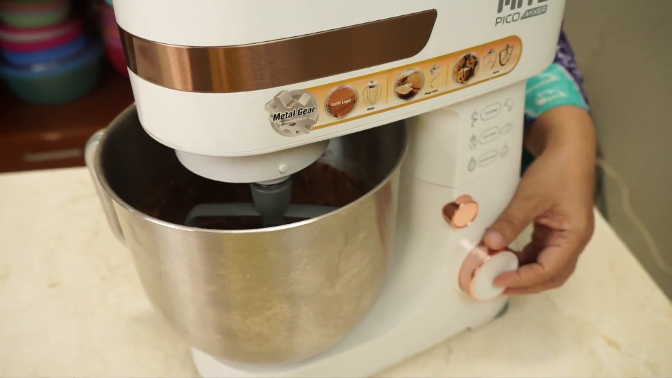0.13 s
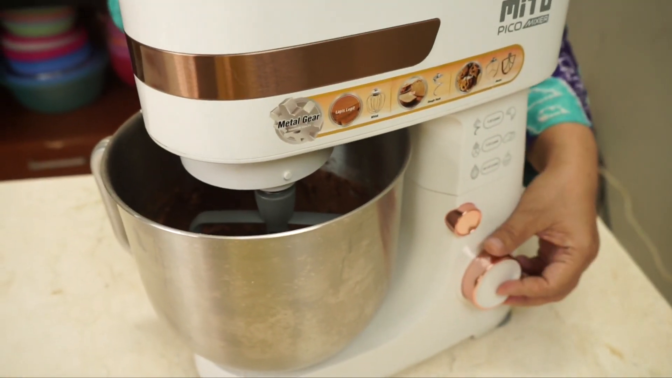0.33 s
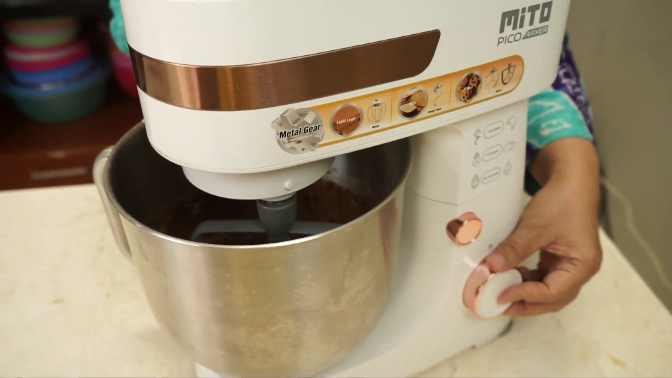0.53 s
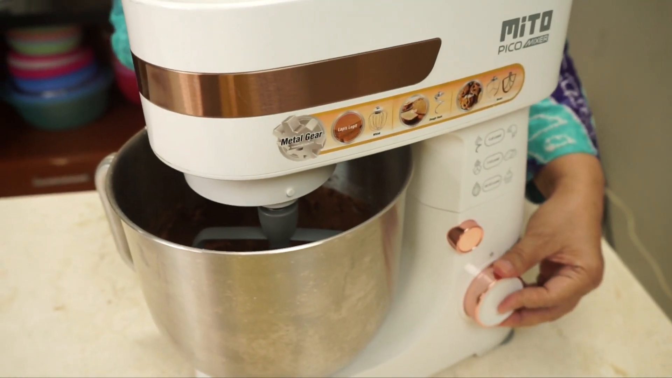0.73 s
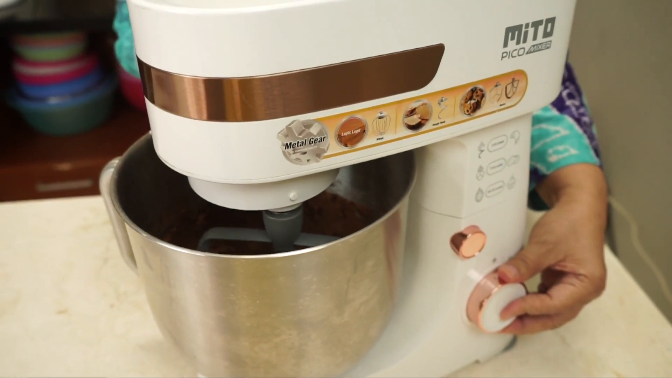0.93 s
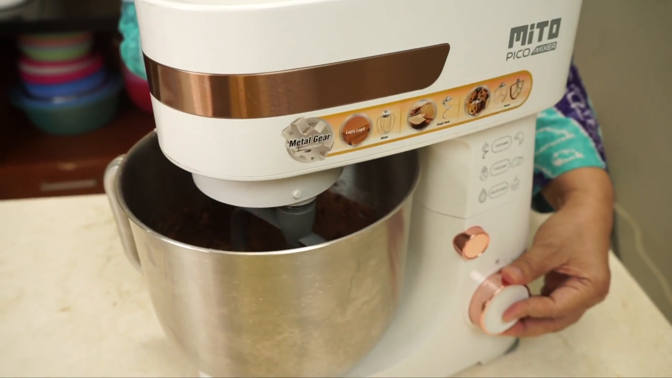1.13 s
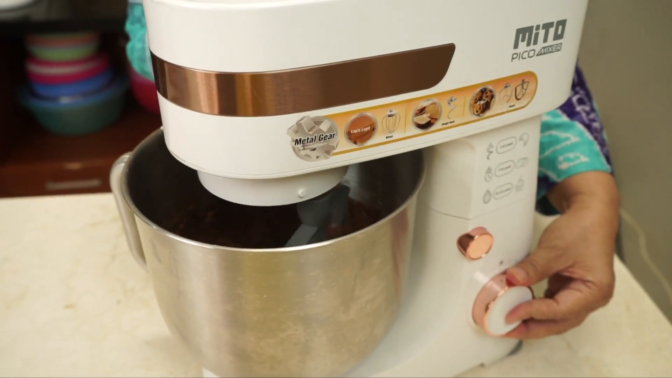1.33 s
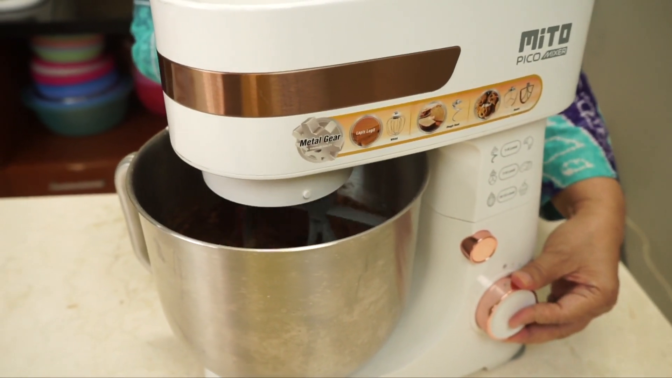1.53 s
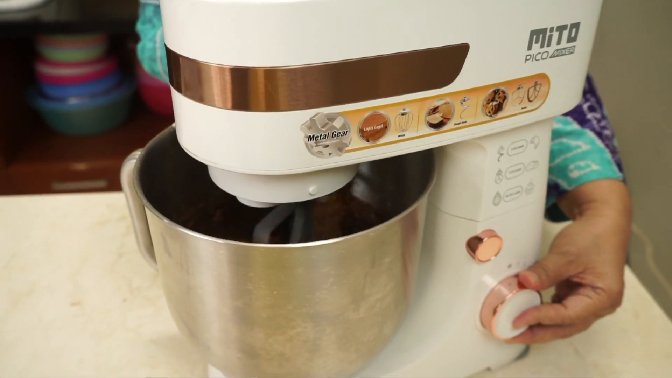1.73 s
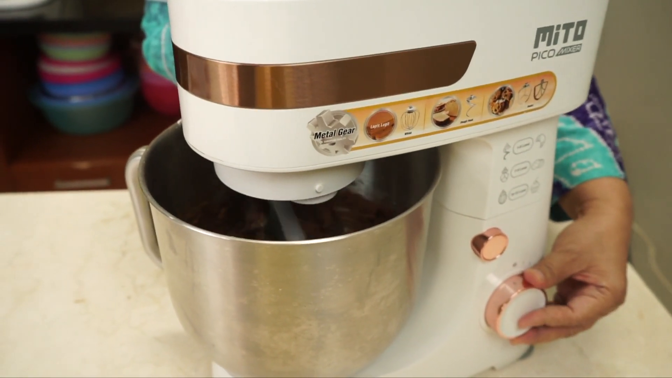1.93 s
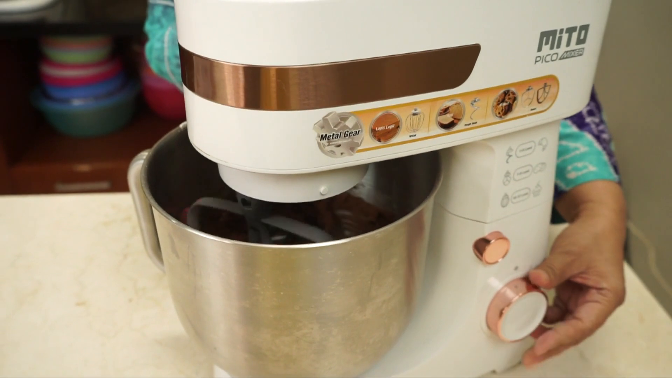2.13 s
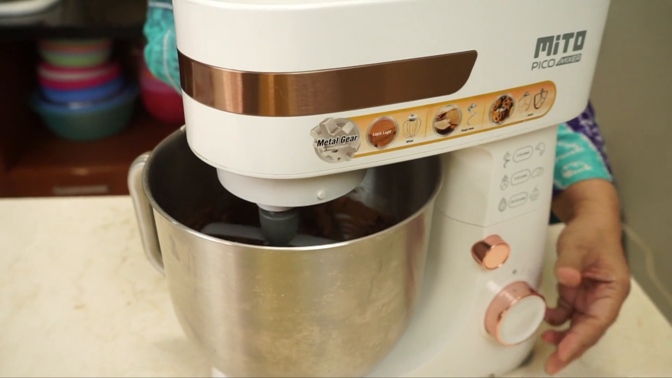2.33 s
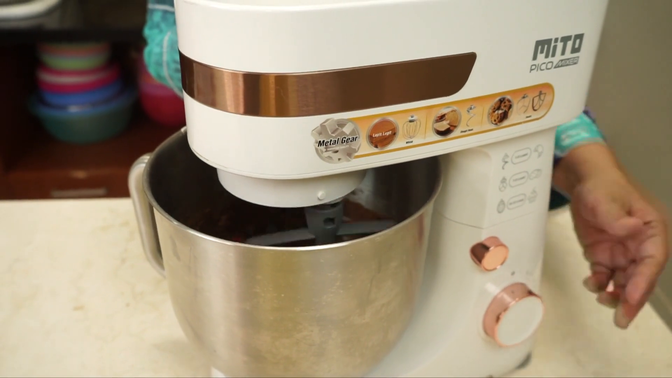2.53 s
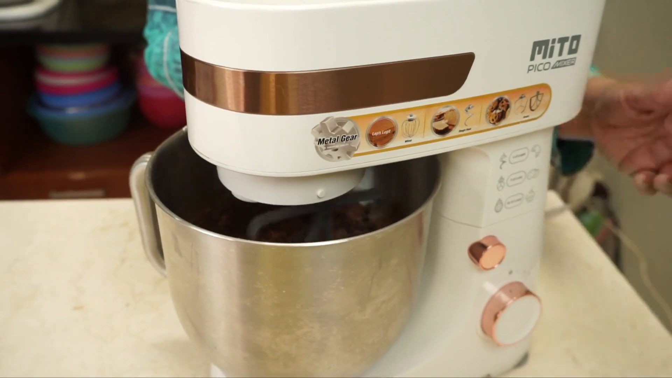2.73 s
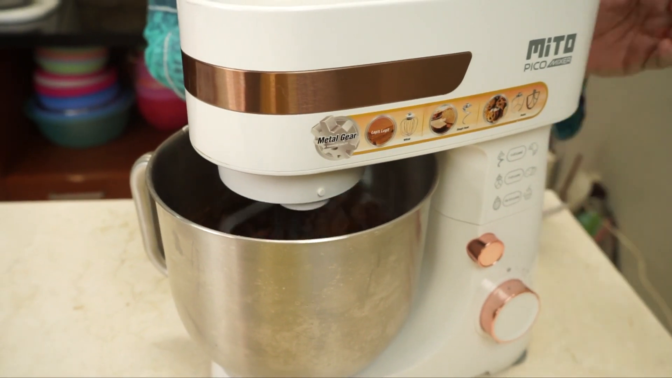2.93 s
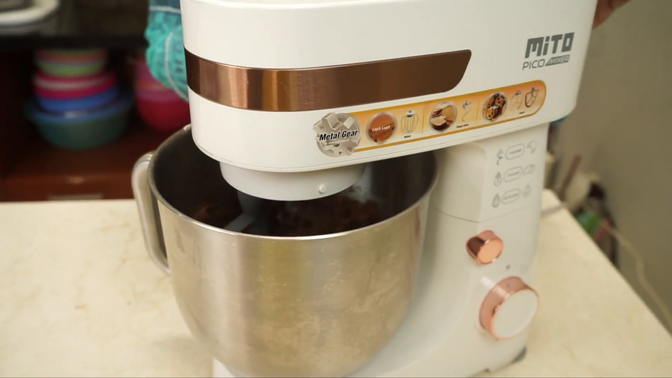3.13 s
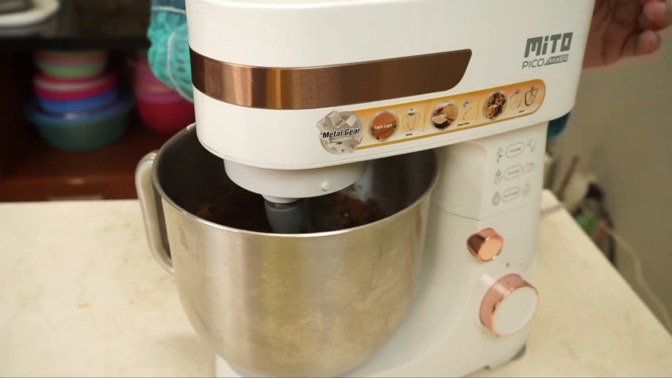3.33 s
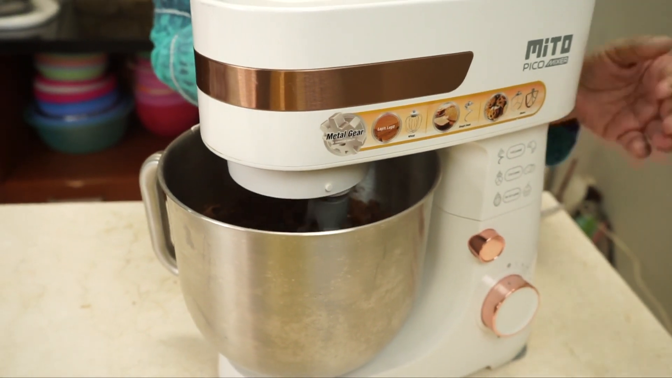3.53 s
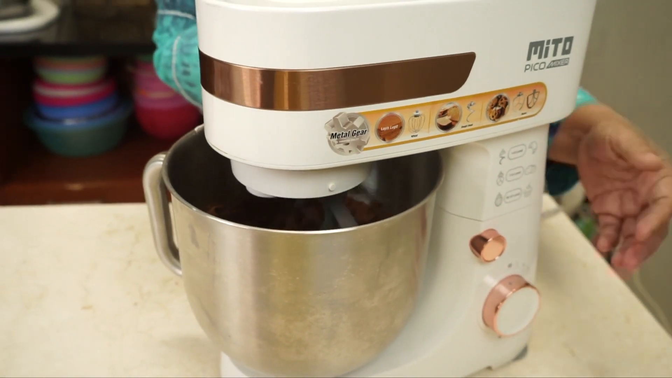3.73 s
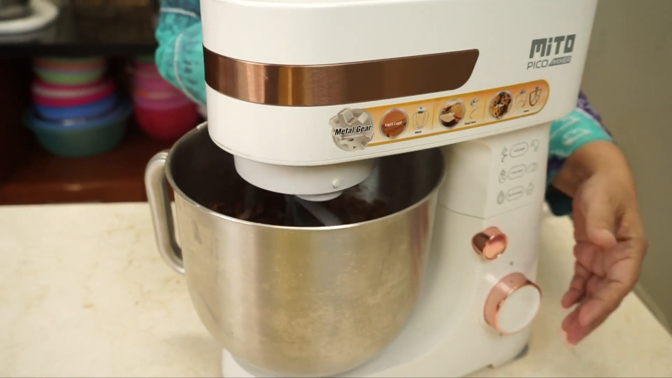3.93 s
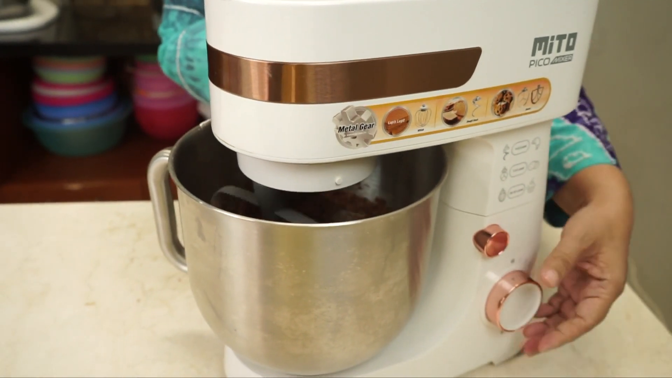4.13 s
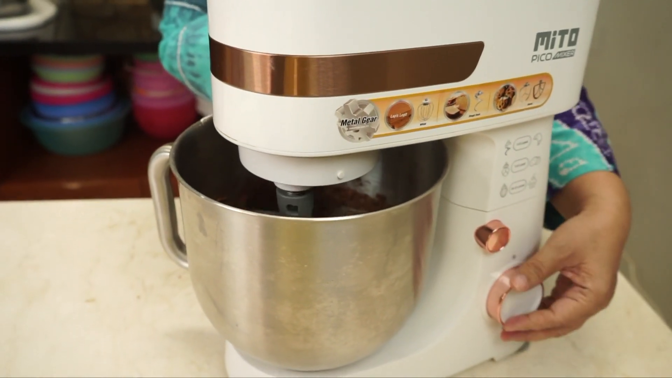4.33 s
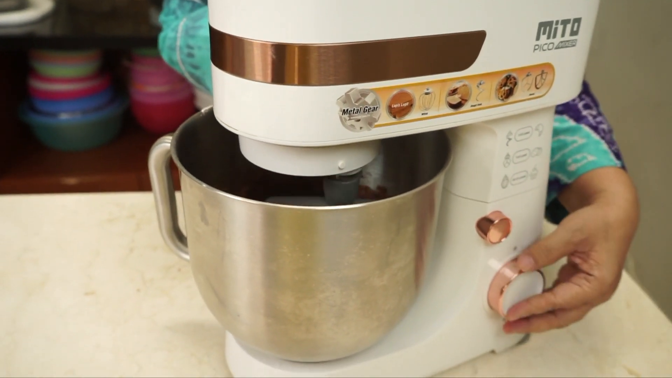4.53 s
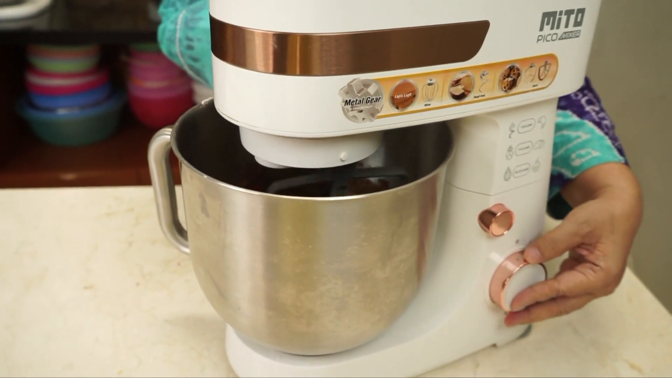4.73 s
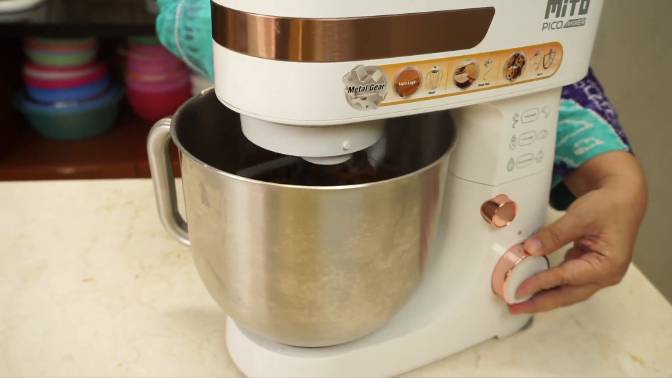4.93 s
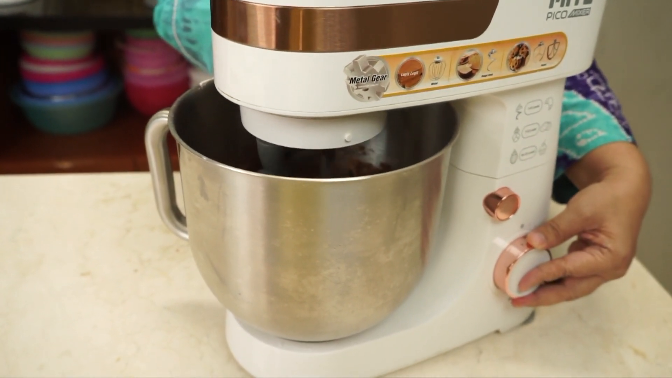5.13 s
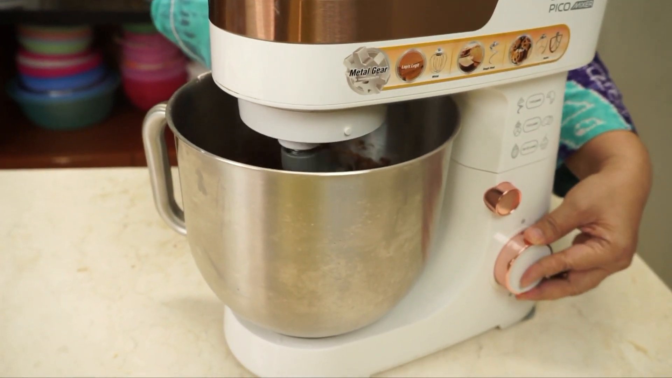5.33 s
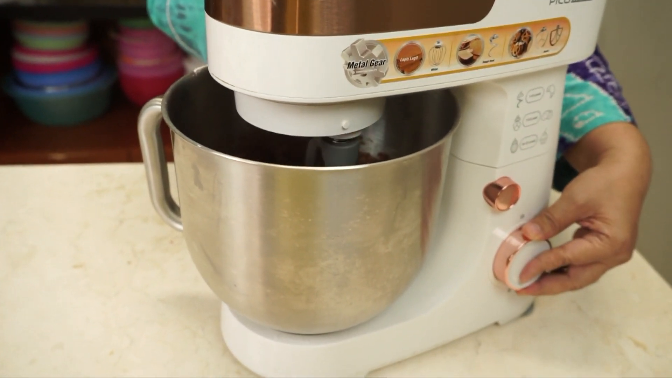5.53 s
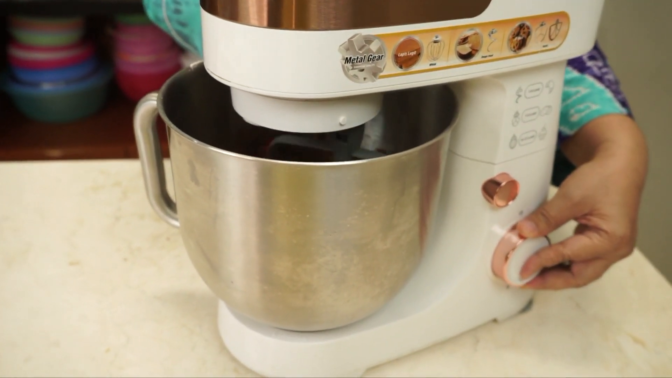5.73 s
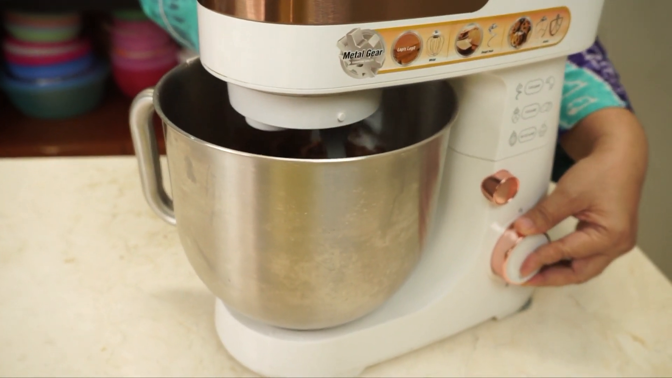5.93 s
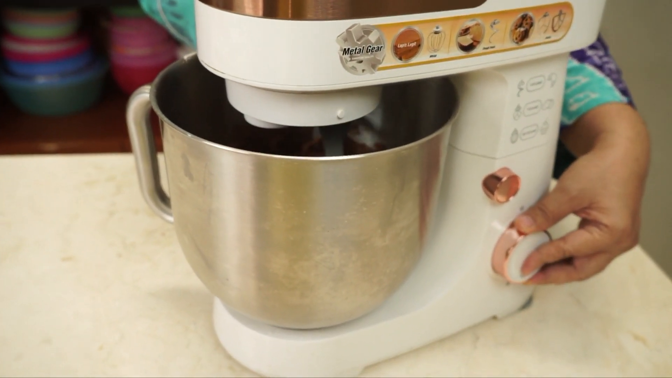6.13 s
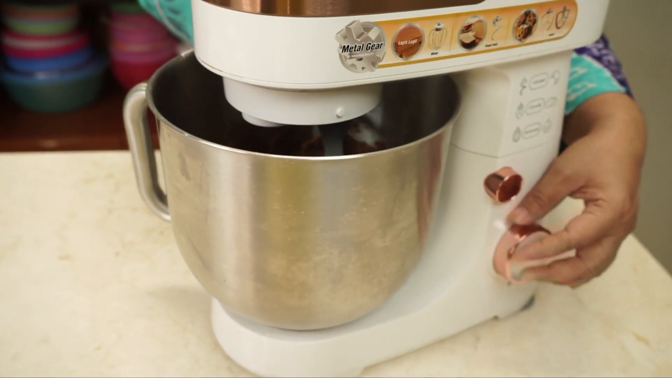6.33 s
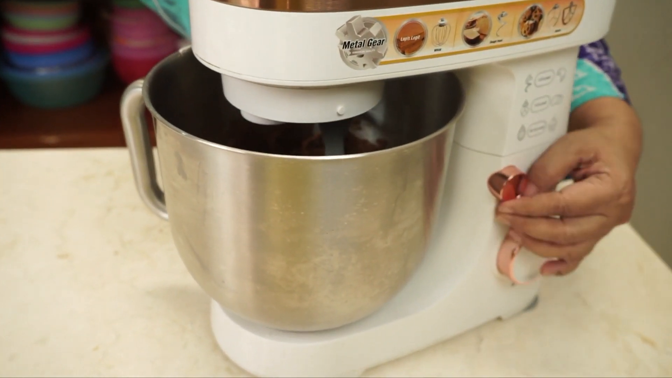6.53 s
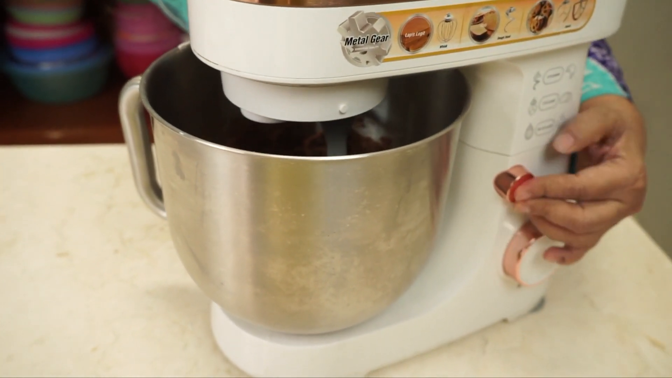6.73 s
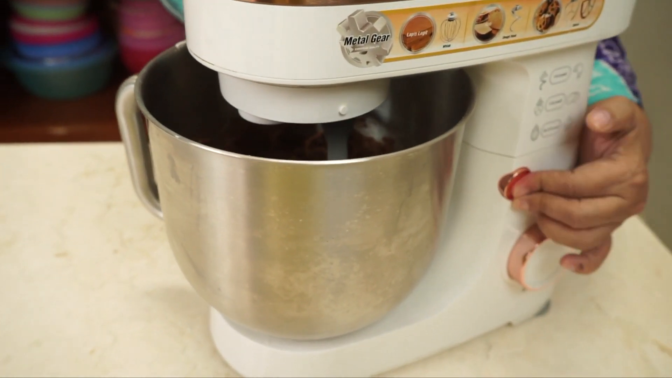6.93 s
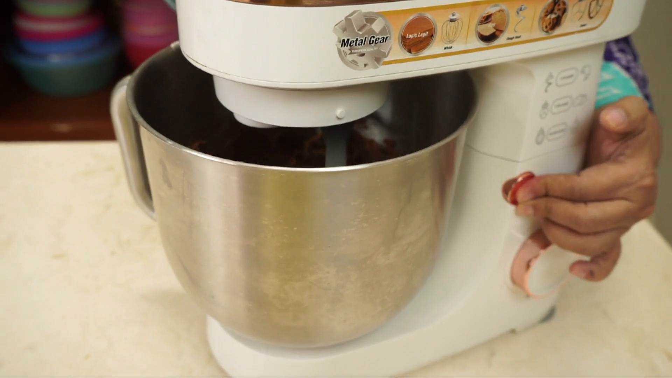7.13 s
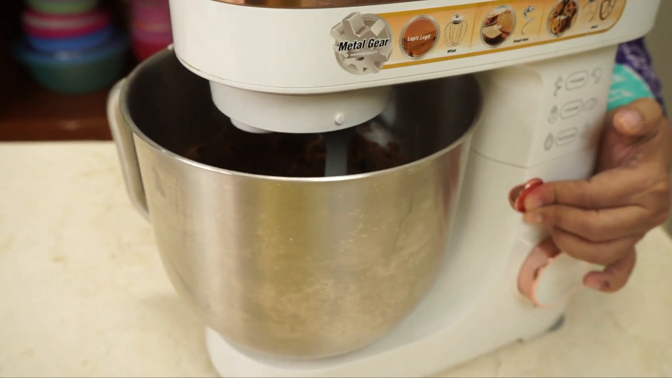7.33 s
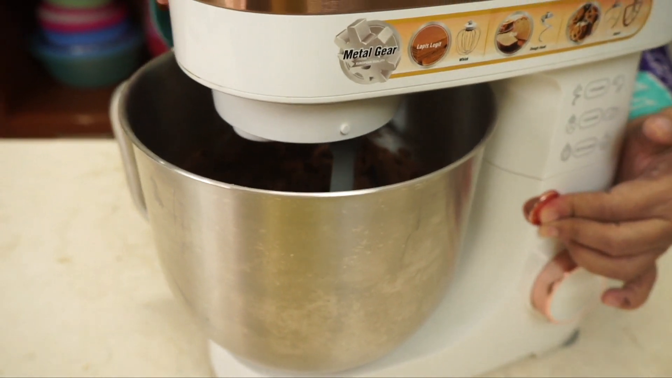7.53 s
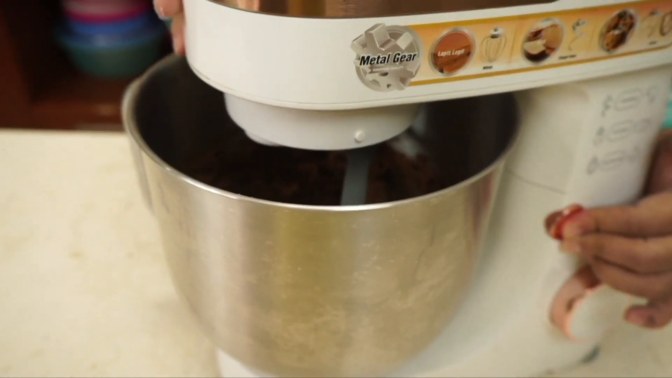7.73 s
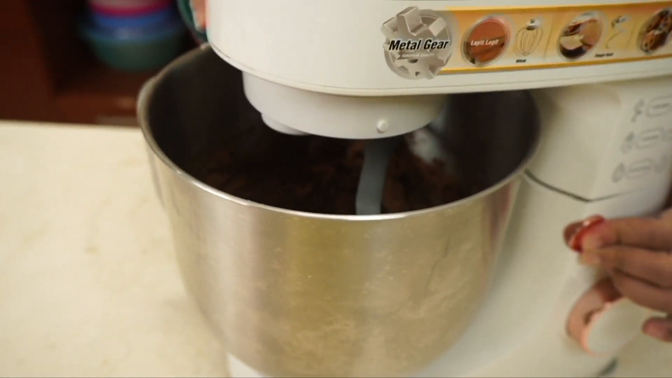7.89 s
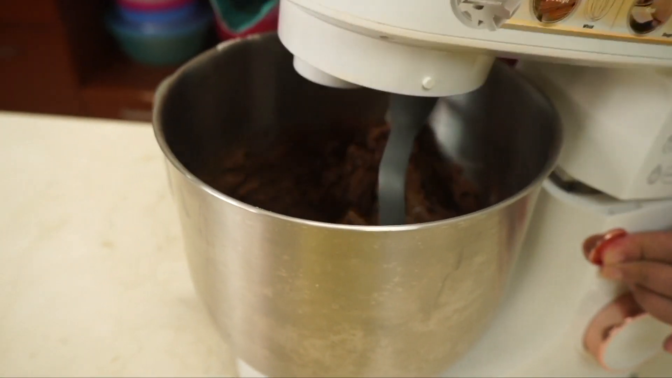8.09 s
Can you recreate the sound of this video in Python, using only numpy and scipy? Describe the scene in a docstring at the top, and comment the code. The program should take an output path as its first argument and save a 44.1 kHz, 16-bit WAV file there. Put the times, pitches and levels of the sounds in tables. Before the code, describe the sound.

Close microphone on a kitchen mixer: dull low thuds, then a motor catches with a buzzing hum. Nasal gear whine rises in steps amid dry clicks and loose gear rattle, settles high and rough, and dips repeatedly as the beater bites dough. Turned down, it slides lower and halts. In the quiet come several small plastic clicks, a very faint breathy ping and one hard clack.

```python
"""A stand mixer in a kitchen: over a droning background come soft low bumps, then the motor starts and hums.
Meshing gear teeth whine, stepping up in speed, while loose gear play rattles the cover and the beater ticks
and briefly scrapes on the bowl. Bites into stiff dough then make the whine sag about three times a second.
The mixer is turned down and stops; the knob and head latch click as damped modes of the plastic body, with
a faint breathy ping, a narrow noise band that dies away, among them."""
import sys
import numpy as np
from scipy import signal
from scipy.fft import rfft, irfft
from scipy.io import wavfile
from scipy.ndimage import uniform_filter1d

SR = 44100
rng = np.random.default_rng(int(sys.argv[2]) if len(sys.argv) > 2 else 0)


def to_wav(sig):
    """Store sig (one row per channel, or 1-D mono) as 16-bit WAV at the path in sys.argv[1].

    Samples outside -1..1 are clipped; the rate is SR.
    """
    pcm = np.clip(np.atleast_2d(sig), -1, 1) * 32767
    pcm = np.round(pcm).astype(np.int16)
    wavfile.write(sys.argv[1], SR, pcm.T)  # frames by channels


N = 359856  # samples

# background spectrum: f/Hz, relative density level/dB per Hz
KITCHEN_SPECTRUM = [(15, -51), (25, -16.5), (130, -14.5), (165, -7.5), (189, -6.5), (228, -15), (276, -3.5),
                    (371, -19), (636, -12.5), (728, -21), (1030, -22.5), (2520, -38), (3040, -36.5),
                    (3480, -40), (15800, -63)]
# the background sinks and dulls, then creeps back: t/s, drone level/dB, extra treble level/dB
KITCHEN_LEVELS = [(0, -27, -40), (.15, -29.5, -48.5), (.3, -30, -46), (.8, -29.5, -49), (2, -28, -50),
                  (4, -39, -56), (6, -36.5, -63.5), (6.5, -36.5, -55.5), (7, -36.5, -49.5),
                  (7.5, -35, -50.5), (8.16, -33.5, -49)]
# soft low bumps, most just before and as the motor catches: t/s, peak level/dB, f/Hz, length/s
LOW_BUMPS = [(0.33, -21, 255, 0.0045), (0.405, -15, 227, 0.0062), (0.433, -21, 142, 0.02),
             (0.541, -16, 187, 0.0064), (0.565, -22.5, 230, 0.023), (0.592, -21, 99.4, 0.0095),
             (0.843, -11, 442, 0.023), (0.891, -16, 450, 0.028), (.922, -13.5, 224, 0.03),
             (0.941, -4, 462, 0.014), (7.357, -30, 252, 0.037), (7.845, -12.5, 870, 0.0034)]
# one faint breathy ping: t/s, f/Hz, level/dB, t60/s
PING = (6.598, 3080, -51, .6)
# knocks on the plastic body: t/s, crack level/dB, thud level/dB, pitch factor, ring length factor
BODY_KNOCKS = [(6.3021, -46, -31.5, 1.02, 0.87), (6.4335, -31, -28.5, 0.98, 1.7),
               (6.9393, -23.5, -20, 1.05, 1.26), (7.3426, -37, -28.5, 1.09, 0.84),
               (7.758, -5, -3.5, 1.01, 0.86), (7.7908, -18.5, -21, 0.97, 0.6),
               (7.8439, -27, -17, 1.04, 0.37)]
# modes of the plastic body: f/Hz, relative level/dB, t60/s at length factor 1
BODY_MODES = [(226, -2.5, 0.12), (306, -5.5, 0.1), (421.5, 0, 0.12), (511, -5, 0.087), (630, -7.5, 0.091),
              (792, -3.5, 0.068), (1025, -4, 0.026), (1380, -21.5, 0.12), (1613, -8.5, 0.035),
              (1980, -6.5, 0.03)]
# the beater drags on the bowl: t/s, level/dB
BOWL_SCRAPE = [(2.39, -39.5), (2.418, -25.5), (2.464, -31.5), (2.514, -29.5), (2.59, -53), (2.62, -45)]
# loose gear play rattling the cover, most while the speed changes: t/s, level/dB
GEAR_CLATTER = [(1.0, -44.5), (1.5, -34), (1.62, -31), (2.2, -26.5), (2.4, -23.5), (2.62, -28), (2.75, -37),
                (5.35, -39.5), (5.5, -33.5), (5.8, -36), (6.0, -57)]
# resonances of the cover: f/Hz, width/Hz, relative level/dB
COVER_MODES = [(1285, 400, 1.5), (1622, 67, 0), (2024, 310, -1), (2395, 71, -8.5), (3300, 86, -17)]
# the clearest beater and knob ticks: t/s, crack level/dB, ring level/dB, pitch factor
CLEAR_TICKS = [(0.7935, -35, -29, 1), (1.0556, -22, -40, 1.2), (1.2217, -43, -28, 1.23),
               (1.2584, -15, -36, 1.9), (1.28, -10, -25, 1.1), (1.4494, -18, -28, 2.3),
               (1.5856, 2, -10.5, 1.02), (1.694, -22, -16.5, 1.04), (1.7027, -6, -20, 1.4),
               (1.727, -20, -24, 0.93), (1.7425, 1, -13, 1.17), (1.816, -6, -23, 0.87),
               (1.8254, -17, -24, 1.13), (2.0165, 5, -15, 1.54), (2.111, -2, -20, 0.93),
               (2.3555, -16, -22, 1.06), (2.375, 7.5, -1, 0.89), (2.4124, -22, -16, 1.01),
               (2.6841, -24, -14, 0.97), (2.7671, -12, -31, 0.876), (2.79, -19, -17, 1),
               (2.975, -41, -16, 0.88), (3.1172, -25, -17, 0.82), (3.289, -6, -24, 1.1),
               (3.557, -24, -10, 0.53), (3.9837, -7, -25, 1.24), (4.2286, -18, -25, 1),
               (4.489, -28, -21, 0.97), (4.8928, -20, -19, 0.8), (5.1412, -26, -36, 0.78),
               (5.3617, -28, -34, 1.2), (5.515, -9, -23, 1.06), (5.6386, -14, -19, 0.79),
               (5.8106, -30, -18.5, 0.98)]
# modes of the bowl: f/Hz, relative level/dB, t60/s at length factor 1
BOWL_MODES = [(900, -3, .012), (1400, -3, .012), (1950, 0, .01), (2500, -3, .01), (3200, -1, .01),
              (3900, -5, .008), (4800, -8, .008), (6200, -14, .006), (8000, -22, .005)]
# motor: t/s, housing rumble level/dB, brush and fan hiss level/dB, loudest panel drone level/dB
MOTOR_LEVELS = [(0.8, -32, -52, -44), (0.86, -30.5, -62, -33), (1.09, -23, -58.5, -20),
                (1.34, -16, -34, -17), (1.6, -18.5, -37.5, -12), (1.8, -17.5, -36.5, -24),
                (2.05, -13.5, -33, -17.5), (2.4, -17.5, -32, -21.5), (3.2, -18, -33, -23),
                (3.8, -20.5, -35.5, -27), (5.1, -21.5, -36, -25.5), (5.6, -24.5, -39.5, -29.5),
                (5.8, -24, -41, -29.5), (5.91, -30, -46.5, -28), (5.98, -41, -60, -42),
                (6.1, -57, -67, -72)]
# resonances of the housing: f/Hz, width/Hz, relative level/dB
HOUSING_MODES = [(126, 19, -19.5), (233.2, 59, -2.5), (288.5, 73, 0.5), (391, 28, -4), (519, 52, 0.5),
                 (628.3, 53, -4), (770.5, 158, 1), (950.6, 34, -5)]
# resonance of the loudest panel: f/Hz, width/Hz, relative level/dB
PANEL_MODE = [(442.2, 24, 0)]
# mains multiples: f/Hz, level/dB against the rumble, before the boost at the start
MAINS_HUM = [(150, -20), (200, -11.5), (250, -13), (300, -18), (450, -16)]
# brush and fan hiss: f/Hz, relative density level/dB per Hz
HISS_SPECTRUM = [(590, -34), (1000, -3.5), (1290, -3), (1740, 4.5), (2120, -8.5), (2520, -12.5),
                 (3860, -18.5), (6710, -24), (8080, -30.5), (15800, -44.5)]
# resonances of the shell rung by hiss: f/Hz, width/Hz, relative level/dB
SHELL_MODES = [(2348, 58, -0.5), (4896, 500, 0), (6680, 530, 0.5), (11600, 300, -27), (14300, 430, -31)]
# knob setting: t/s, unloaded tooth rate f/Hz, force level on the teeth/dB
KNOB_SPEED = [(1.2, 404.2, -39), (1.32, 411, -10.5), (1.5, 430, -18), (1.62, 488, -15.5), (1.81, 550, -11),
              (1.85, 600, -25), (1.91, 720, -16), (2.1, 719.4, -13.5), (2.3, 897.2, -12.5),
              (3.2, 900.9, -14.5), (4.2, 884, -16), (4.4, 899, -17.5), (5.4, 894, -17), (5.55, 730, -23),
              (5.63, 600, -31), (5.85, 440.4, -27), (5.9, 411.5, -24.5), (5.98, 314.8, -57)]
# the beater bites into the dough: t/s of the deepest sag, sag/Hz, recovery time/s
DOUGH_BITES = [(2.44, 110.3, 0.059), (2.54, 95.25, 0.04023), (2.809, 99.7, .17), (3.149, 90.33, 0.081),
               (3.45, 120.1, .11), (3.769, 69.63, 0.16), (4.07, 69.63, .08), (4.35, 120.2, .14),
               (4.65, 94.5, 0.14), (4.971, 94.8, .13), (5.26, 114.7, .09)]
# multiples of the tooth rate, from the first: level/dB, roughness (0-1)
TOOTH_MULTIPLES = [(-0.5, 0.49), (-1.5, 0.4), (-17.5, 0.6), (-22.5, 0.6)]
# how well the whine gets out of the casing: f/Hz, transmission level/dB
CASING_RESPONSE = [(330, -7), (420, -12.5), (500, -2), (600, -9.5), (720, -1.5), (760, -13), (800, -0.5),
                   (835, -1.5), (870, -1), (900, 0.5), (1000, -12), (1300, -19), (1610, -9.5), (1670, -11),
                   (1730, -7.5), (2000, -9.5), (2450, -10), (3600, -11)]

TEETH = 38.5  # tooth contacts for one turn of the shaft
SAG_S = 0.07  # time scale of the fall in speed at a bite
LABOUR_DB, LABOUR_S = 12.5, 0.37  # the hum is stronger while the motor picks up speed
RING_LENGTH, LONGER_PER_DB = 2.18, 0.02  # length factor of a 0 dB tick; softer ones die sooner
FAINT_TICKS, FAINT_FROM_S, FAINT_TO_S = 12, 1.1, 5.7
FAINT_CRACK_DB, FAINT_RING_DB, FAINT_SPREAD_DB = -27, -35, 3  # two means and their spread
BAND_EDGE_HZ = 15840

T = np.arange(N) / SR  # time, s


def gain_of(db):
    """The decibel law: level to amplitude factor."""
    return 10 ** (np.asarray(db) / 20)


def evened(x):
    """Normalisation to unit rms."""
    return x / np.sqrt(np.mean(x ** 2) + 1e-20)


def curves(rows):
    """Linear interpolation of a table's columns, and a gate that is open while the table runs."""
    s, *columns = np.transpose(rows)
    gate = np.clip(np.minimum(T - s[0], s[-1] - T) / 0.018, 0, 1)
    return [np.interp(T, s, c) for c in columns] + [gate]


def wander(hz):
    """Low-passed Gaussian noise: slow chance of unit rms, up to about hz."""
    return evened(signal.lfilter(*signal.butter(2, hz, fs=SR), rng.standard_normal(N)))


def resonate(x, hz, width):
    """Heterodyne resonance: hz is shifted down to zero, smoothed twice and shifted back."""
    turn = np.exp(2j * np.pi * np.cumsum(hz * np.ones(len(x))) / SR)
    r = np.exp(-np.pi * width / SR)
    smooth = signal.lfilter([(1 - r) ** 2], [1, -2 * r, r * r], x / turn)
    return 2 * (turn * smooth).real


def ring(x, modes):
    """Parallel resonance: x drives fixed modes (f/Hz, width/Hz, level/dB), each applied twice."""
    out = 0
    for hz, width, db in modes:
        peak = np.hstack(signal.iirpeak(hz, hz / width, SR))
        out = out + gain_of(db) * evened(signal.sosfilt([peak, peak], x))
    return evened(out)


def noise(points, patchy_db, size):
    """Spectral synthesis: random short-time spectra of a given shape, with drifting patches."""
    hz, (f, db) = np.fft.rfftfreq(size, 1 / SR), np.transpose(points)
    a, b, patches = rng.standard_normal((4 * N // size + 5, len(hz), 3)).T
    patches = uniform_filter1d(uniform_filter1d(patches, size=12, axis=0), size=12, axis=1)
    shape_db = np.interp(np.log(hz + 1), np.log(f + 1), db)[:, None]
    spectra = (a + 1j * b) * gain_of(shape_db + patchy_db * evened(patches))
    return evened(signal.istft(spectra, nperseg=size, noverlap=size - size // 4)[1][:N])


def blows(rows, modes, crack_hz, crack_t60, rattle_db, rattle_t60):
    """Impact excitation: a noisy crack with a rattling tail, plus damped modes that vary each time."""
    out, t = np.zeros(N + 6000), np.arange(6000) / SR
    band = signal.butter(3, [900, crack_hz], "band", fs=SR)
    onset = 1 - np.exp(-t / 0.00069)
    for s, crack_db, ring_db, pitch, length in rows:
        tones = 0
        for k, (hz, db, t60) in enumerate(modes):
            level_chance, pitch_chance = rng.standard_normal(2)
            mode_hz = hz * pitch * (1 + 0.022 * pitch_chance)
            decay = gain_of(db + 2 * level_chance - 60 * t / (t60 * length))
            tones = tones + (-1) ** k * decay * np.sin(2 * np.pi * mode_hz * t)
        grit = rng.standard_normal(len(t))
        grit = signal.lfilter(*band, grit) + 0.016 * grit
        fade = gain_of(-60 * t / (crack_t60 * length))
        rattle = gain_of(rattle_db - 60 * t / rattle_t60)
        blow = gain_of(crack_db) * grit * (fade + rattle) + gain_of(ring_db) * tones
        at = round(s * SR)
        out[at:at + len(t)] += blow * onset
    return out[:N]


def room(x):
    """Diffuse reverberation: a short noisy tail from hard walls, duller as it dies."""
    t = np.arange(12000) / SR
    tail = rng.standard_normal(len(t)) * (t > 0.006)
    low = resonate(tail, 0, 3700) / 2
    tail = low * gain_of(-60 * t / 0.58) + (tail - low) * gain_of(-60 * t / 0.39)  # t60 in s
    return signal.oaconvolve(x, tail / np.linalg.norm(tail))[:N]


def kitchen():
    """Stationary filtered noise: a low drone with a faint wide hiss, each following a level curve."""
    drone_db, treble_db, _ = curves(KITCHEN_LEVELS)
    drone = noise(KITCHEN_SPECTRUM, 0.59, size=4096)
    treble = ring(rng.standard_normal(N), [(1510, 4050, 11), (4870, 2500, -26.5)])
    return gain_of(drone_db) * drone + gain_of(treble_db) * treble


def bumps():
    """Strongly damped vibration: a few cycles that swell quickly and fade more slowly."""
    out, t = np.zeros(N), np.arange(-3000, 3000) / SR
    for s, db, hz, length in LOW_BUMPS:
        swell = np.exp(-(np.where(t < 0, 3.5, 1.6) * t / length) ** 2)
        out[round(s * SR) - 3000:][:6000] += gain_of(db) * np.cos(2 * np.pi * hz * t) * swell
    return out


def breathy_ping():
    """Narrow-band noise under exponential decay: a slightly fuzzy tone that dies away."""
    s, hz, db, t60 = PING
    t = T - s
    decay = gain_of(db - 60 * abs(t) / t60) * (t > 0)
    return decay * ring(rng.standard_normal(N), [(hz, 120, 0)])


def body_knocks():
    """Modal response to impact: knob and latch clicks excite the damped modes of the plastic body."""
    return blows(BODY_KNOCKS, BODY_MODES, 4580, 0.02, 0.5, 0.039)


def scrape():
    """Sliding friction: gritty wide noise with a rapidly fluctuating level."""
    db, gate = curves(BOWL_SCRAPE)
    grit = rng.standard_normal(N) * gain_of(2.0 * wander(298))
    return gate * gain_of(db) * ring(grit, [(3000, 2000, 0), (7000, 8000, -29)])


def clatter():
    """Random impact excitation: a dense patter of small taps, a few large, rings the cover."""
    db, gate = curves(GEAR_CLATTER)
    size = gain_of(4.2 * np.minimum(rng.exponential(1, N), 5)) * rng.standard_normal(N)
    taps = size * (rng.random(N) < 2500 / SR)  # about 2500 a second
    return gate * gain_of(db + 2.3 * wander(23)) * ring(taps, COVER_MODES)


def ticks():
    """Modal response to impact: clear ticks and a scatter of faint ones ring the bowl."""
    when = rng.uniform(FAINT_FROM_S, FAINT_TO_S, FAINT_TICKS)
    crack, ringing, pitch = rng.standard_normal((3, FAINT_TICKS))
    crack_db = FAINT_CRACK_DB + FAINT_SPREAD_DB * crack
    ring_db = FAINT_RING_DB + FAINT_SPREAD_DB * ringing
    faint = zip(when, crack_db, ring_db, np.exp(0.15 * pitch))
    rows = [(*row, RING_LENGTH + LONGER_PER_DB * row[2]) for row in [*CLEAR_TICKS, *faint]]
    return blows(rows, BOWL_MODES, 2820, 0.013, -21, 0.021)


def mains_hum():
    """Harmonic magnetic force: wavering mains multiples, strongest as the motor starts."""
    hum = 0
    for hz, db in MAINS_HUM:
        tone = np.sqrt(2) * np.sin(2 * np.pi * (hz * T + rng.random()))
        hum = hum + gain_of(db + 2.34 * wander(3.2)) * tone
    start_s = MOTOR_LEVELS[0][0]
    return hum * gain_of(LABOUR_DB * np.exp(-abs(T - start_s) / LABOUR_S))


def motor(shaft):
    """Forced vibration: rough drive rings housing and panel over hum; brush and fan hiss rings the shell."""
    rumble_db, hiss_db, panel_db, gate = curves(MOTOR_LEVELS)
    drive = rng.standard_normal(N) * gain_of(2.0 * wander(26))
    rumble = gain_of(rumble_db + 0.83 * wander(5)) * (ring(drive, HOUSING_MODES) + mains_hum())
    panel = gain_of(panel_db + 2.1 * wander(8)) * ring(drive, PANEL_MODE)
    brush_catch = gain_of(1.5 * wander(43)) * (1 + 0.2 * shaft)  # brushes catch unevenly
    wide_hiss = gain_of(7) * noise(HISS_SPECTRUM, 2.1, size=1024)
    shell = gain_of(-5) * ring(rng.standard_normal(N), SHELL_MODES)
    hiss = gain_of(hiss_db) * (wide_hiss + shell) * brush_catch
    return gate * (rumble + panel + hiss)


def tooth_rate(free_hz):
    """Load on a driven shaft: every bite drags the speed down; recovery has its own time scale."""
    sag_hz = 0
    for s, hz, recovery_s in DOUGH_BITES:
        sag_hz = sag_hz + hz * np.exp(-((T - s) / np.where(T < s, SAG_S, recovery_s)) ** 2)
    return free_hz - sag_hz


def gear_whine(tooth_hz, tooth_cycles, force_db, load):
    """Gear-mesh excitation: multiples of the tooth rate, part tone and part fuzz, leave by the casing."""
    flicker_db = 2.2 * wander(12)  # the force flickers
    turn_phase = 2 * np.pi * tooth_cycles / TEETH
    wobble = 0.3 * np.sin(3 * turn_phase) + 0.25 * np.sin(5 * turn_phase)  # uneven tooth spacing
    mesh = 0
    for k, (db, rough) in enumerate(TOOTH_MULTIPLES, 1):
        clean = np.sqrt(2) * np.cos(k * (2 * np.pi * tooth_cycles + wobble)) * gain_of(1.4 * wander(22))
        # uneven tooth contact
        fuzz = evened(resonate(rng.standard_normal(N), k * tooth_hz, 70 * k ** 1.6))
        blend = np.sqrt(1 - rough ** 2) * clean + rough * fuzz
        mesh = mesh + gain_of(force_db + flicker_db + db) * blend
    f, through_db = np.transpose(CASING_RESPONSE)
    casing = gain_of(np.interp(np.log(np.fft.rfftfreq(N, 1 / SR) + 1), np.log(f), through_db))
    whine = irfft(rfft(mesh * load) * casing, N)
    return whine + gain_of(-9) * room(whine)  # echoes break the whine into strands


def mixer():
    """Load modulation: the off-centre shaft swings the load on gears and brushes once a turn."""
    free_hz, force_db, gate = curves(KNOB_SPEED)
    tooth_hz = tooth_rate(free_hz)
    tooth_cycles = np.cumsum(tooth_hz * (1 + 0.007845 * wander(29.4) + 0.004 * wander(7.8))) / SR
    swing = 0
    for k, share in ((1, 0.32), (2, 0.13), (3, 0.29)):  # multiples of the turning rate
        swing = swing + share * np.cos(2 * np.pi * k * tooth_cycles / TEETH + 1.26 * wander(2.8))
    shaft = gate * swing
    return gear_whine(tooth_hz, tooth_cycles, force_db, gate * (1 + shaft)) + motor(shaft)


def scene():
    """Superposition: kitchen, mixer and small noises add, with a room tail on ticks and knocks."""
    taps, knocks = ticks(), body_knocks()
    echo = room(gain_of(-12) * taps + gain_of(-8) * knocks)
    small = bumps() + breathy_ping() + scrape() + clatter()
    return (kitchen() + small + taps + knocks + echo + mixer())[None]


def record(dry):
    """Limiting: deep bass is dropped, a limiter ducks after peaks, which also clip; then the band limit."""
    thin = signal.lfilter(*signal.butter(2, 70, "high", fs=SR), dry)
    fall_db = T * 350.0  # the held peak falls 350 dB a second
    peak_db = 20 * np.log10(abs(thin) + 1e-9)
    held_db = np.maximum.accumulate(peak_db + fall_db, axis=1) - fall_db
    over_db = np.maximum(held_db + 5.5, 0)  # threshold -5.5 dB
    duck_db = 0.35 * uniform_filter1d(over_db, size=90, origin=44)  # averaged over the past 2 ms
    clipped = np.clip(thin / gain_of(duck_db), -1, 1)
    band_limit = signal.firwin(511, BAND_EDGE_HZ, window=("kaiser", 9), fs=SR)
    return signal.oaconvolve(clipped, band_limit[None], "same")


dry = scene()
out = record(dry)
to_wav(out)
```